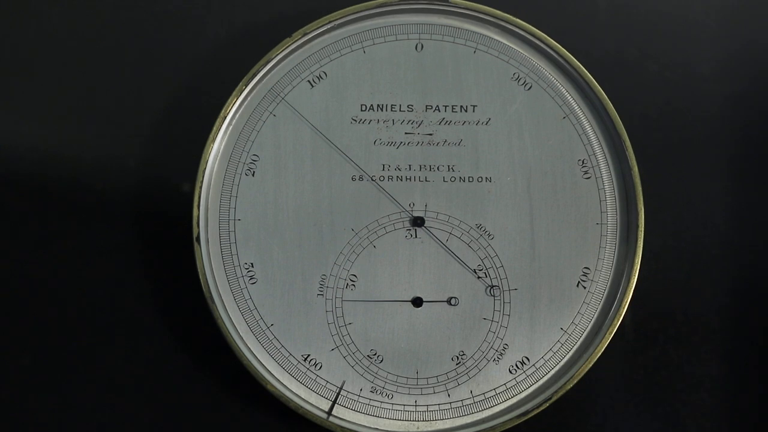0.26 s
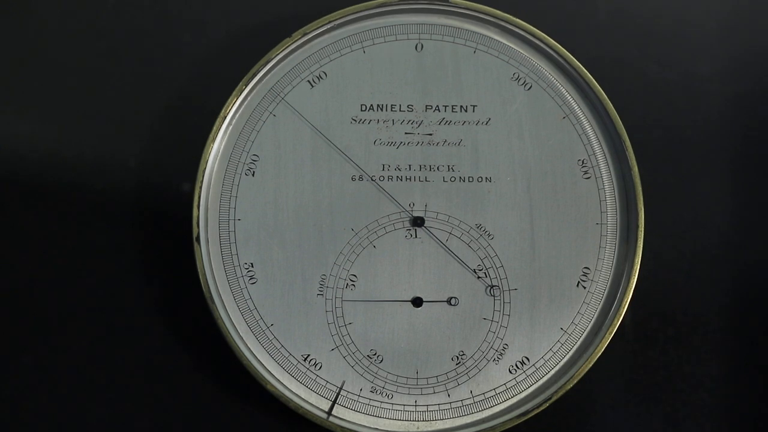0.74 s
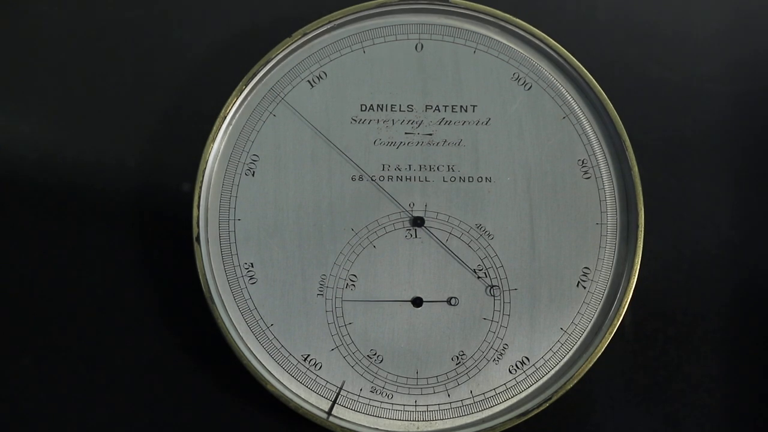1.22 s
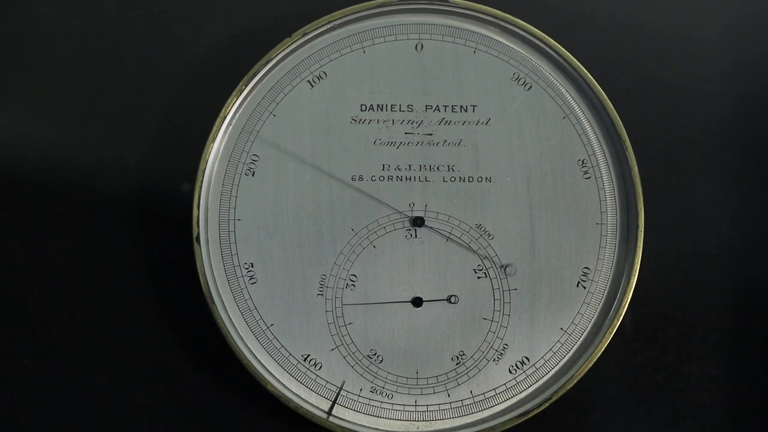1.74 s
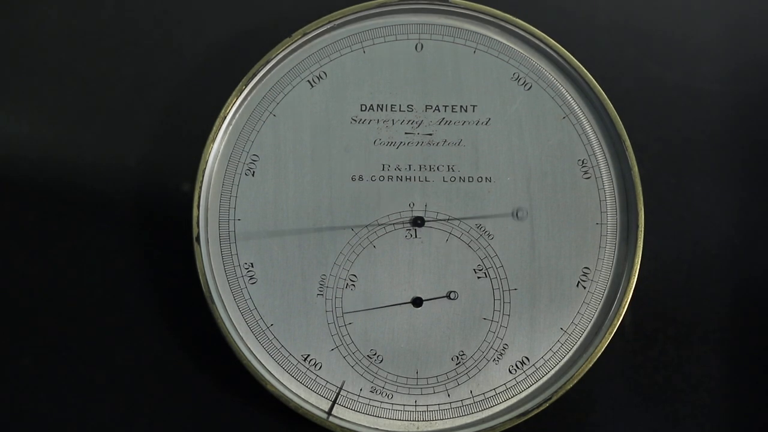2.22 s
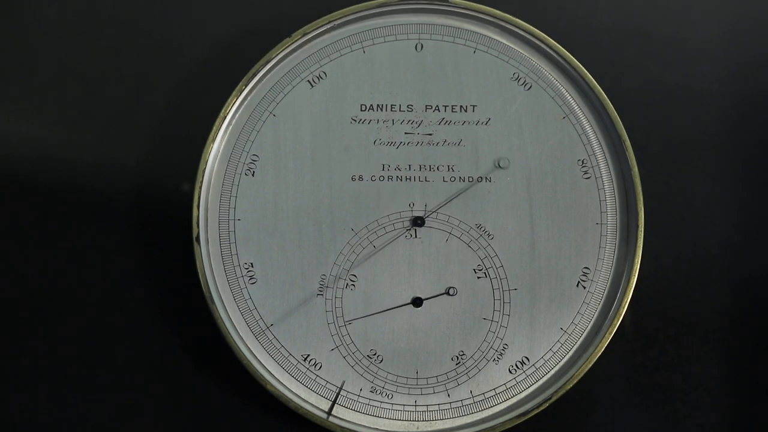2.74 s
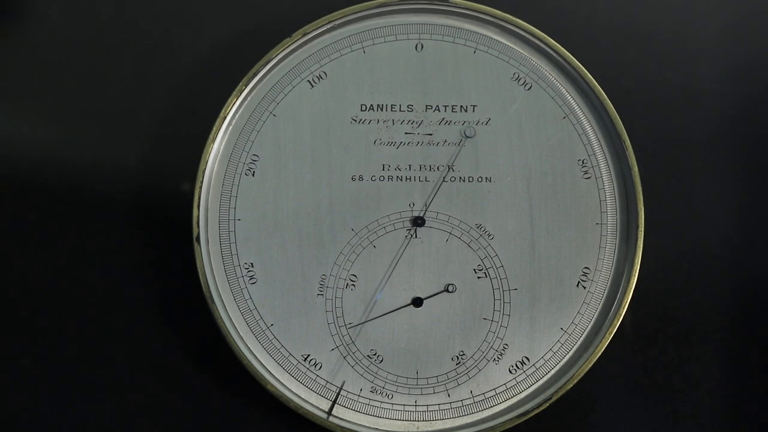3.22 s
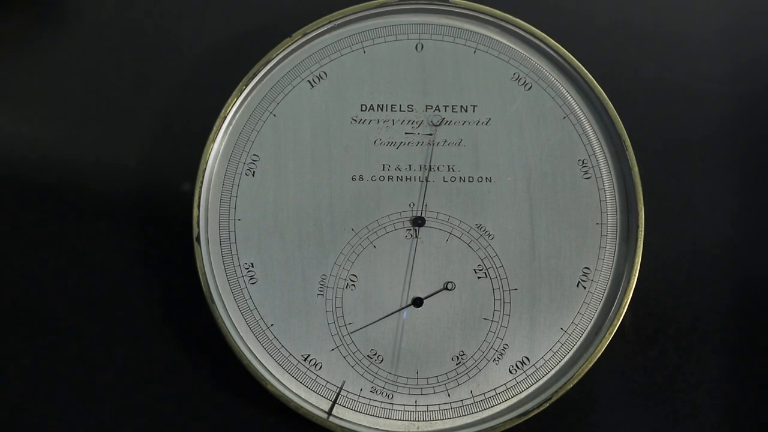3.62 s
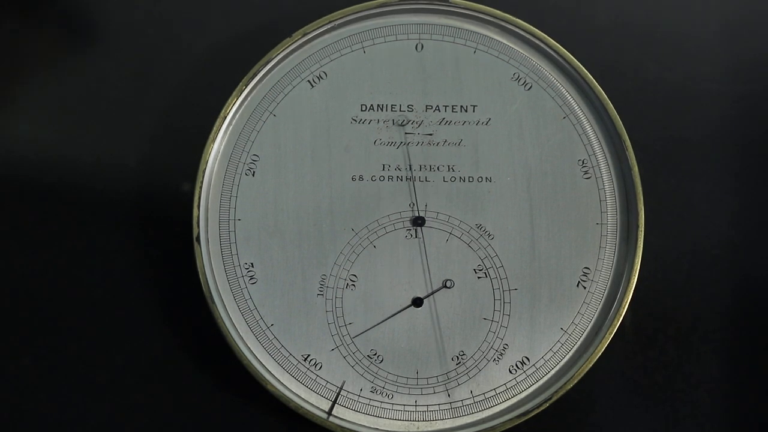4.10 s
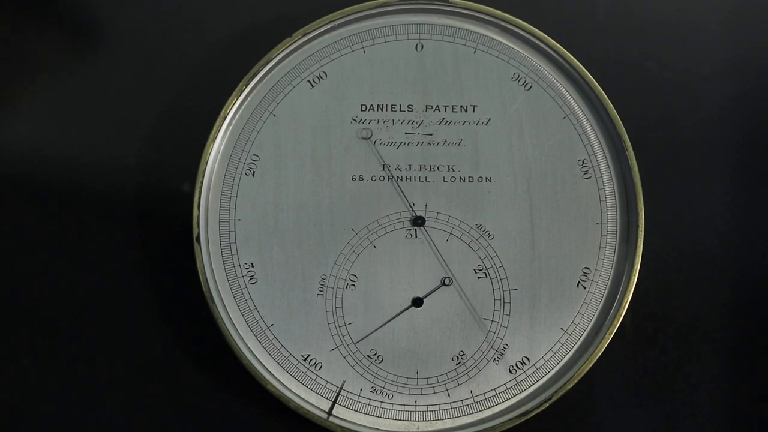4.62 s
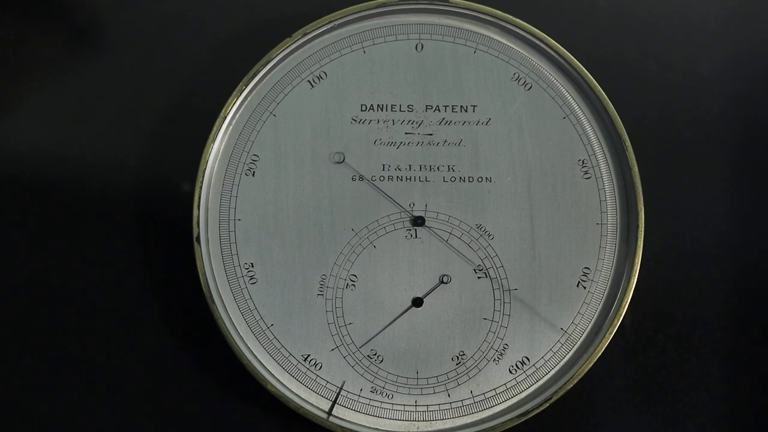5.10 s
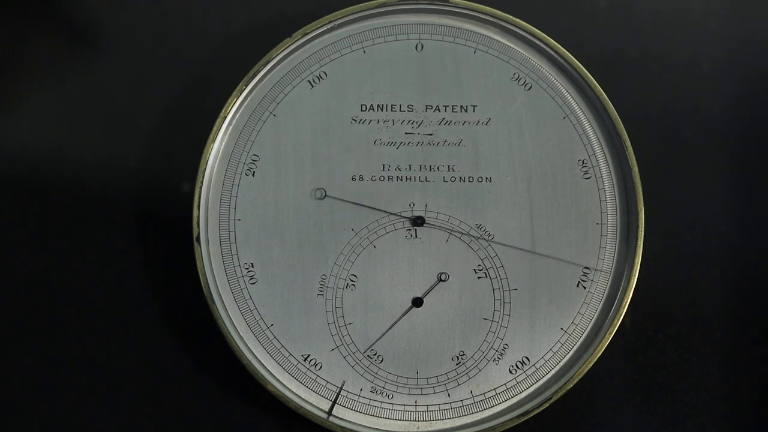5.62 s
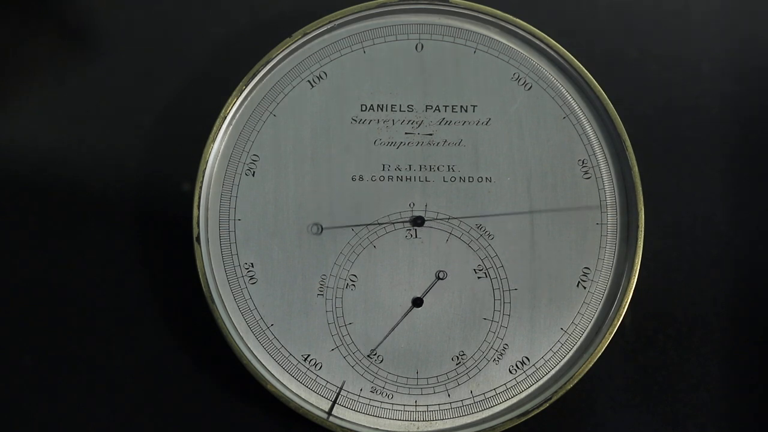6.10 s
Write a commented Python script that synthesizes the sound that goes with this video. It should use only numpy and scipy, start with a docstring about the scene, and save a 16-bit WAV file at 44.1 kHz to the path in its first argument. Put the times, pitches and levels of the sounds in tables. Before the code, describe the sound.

A quiet room with a faint, dark, wide hush. At about 0.14 s a small bright tick sounds nearby, with two much fainter bounces within ten milliseconds. Around 0.54 s comes a very soft, dull knock, blurred by the room. At 1.44 s a switch snaps with a loud, broadband crack, slightly left and briefly overloaded. At once a small electric vacuum pump starts: a bright brush rasp for a tenth of a second, a low thud near 80 Hz, and a rough, rattling whir sweeping quickly upward, swelling as it passes casing resonances. By roughly 2.5 to 3 s it settles into a steady, piercing whine near 1.1 to 1.2 kHz, beating and buzzing, with many higher tones and a hiss of air. From 4.7 s the load eases: the whine softens slightly and creeps up minutely in pitch, still running when the sound ends around 6.35 s.

```python
"""A tick with two fainter bounces and a dull knock break the hush of a room; then a switch snaps and a small
mains-driven vacuum pump rasps, thuds on its feet, runs up and settles into a whine.
Four vanes and twelve rotor slots sing on multiples of the shaft speed, and the mains field splits the slot tone.
Sums of sinusoids make the tones, which swell as they climb through the resonances of the casing;
shaped noise makes the air and brush hiss, the rasp, snap, tick, knock and hush."""
import sys
import numpy as np
from scipy import signal
from scipy.fft import rfft, irfft, next_fast_len
from scipy.io import wavfile
from scipy.ndimage import uniform_filter1d

SR = 44100
rng = np.random.default_rng(int(sys.argv[2]) if len(sys.argv) > 2 else 0)


def wav_record(signal):
    """Record a signal, one row per channel, as 16-bit PCM in the file named by sys.argv[1]."""
    frames = np.transpose(np.atleast_2d(signal))
    bounded = np.clip(frames, -1, 1)
    # unit amplitude maps onto the largest positive 16-bit level
    quanta = np.round(bounded * 32767).astype(np.int16)
    wavfile.write(sys.argv[1], SR, quanta)


N = 280035

START_S = 1.437  # the switch closes
FIELD_HZ = 99.85  # the magnetic pull pulses at twice the mains frequency
FULL_TURNS_PER_S = 91.14  # shaft speed at the end of the run-up
EASE_S = 4.7  # from here on the load eases
HOP = 256  # samples between noise frames and between control points
BINS_HZ = np.fft.rfftfreq(1024, 1 / SR)[:, None]


def gain_of(db):
    """Decibel law: level in dB to amplitude ratio."""
    return 10 ** (np.asarray(db) / 20)


def evened(x):
    """Power normalization: scales to rms 1."""
    return x / np.sqrt(np.mean(x ** 2) + 1e-20)


def read(points, hz):
    """Interpolates an (f/Hz, value) table on a logarithmic frequency axis."""
    f, value = np.transpose(points)
    return np.interp(np.log(hz + 1), np.log(f + 1), value)


def drift(shape, size):
    """Low-passed randomness: twice-averaged noise along the last axis, rms 1."""
    x = rng.standard_normal(shape)
    return evened(uniform_filter1d(uniform_filter1d(x, size), size))


def noise(field_db, same, count):
    """Spectral shaping: random spectra weighted by field_db(hz, t); same is the left-right coherence."""
    t = np.arange(count // HOP + 5) * HOP / SR
    a, b, c, d = rng.standard_normal((4, len(BINS_HZ), len(t)))
    same = np.clip(same, 0, 1)
    left = a + 1j * b
    right = same * left + np.sqrt(1 - same ** 2) * (c + 1j * d)
    spectra = np.array([left, right]) * gain_of(field_db(BINS_HZ, t))
    sound = signal.istft(spectra, nperseg=1024, noverlap=1024 - HOP)[1]
    return evened(sound[:, :count])


def rotor(t, climb_share=.7703, climb_s=.2928, lurch_s=.1041, creep_turns_per_s2=.17):
    """Exponential run-up in turns/s: a quick lurch and a slower climb, then a creep as the load eases."""
    on = np.maximum(t - START_S, 0)
    lack = climb_share * np.exp(-on / climb_s) + (1 - climb_share) * np.exp(-on / lurch_s)
    return FULL_TURNS_PER_S * (1 - lack) + creep_turns_per_s2 * np.maximum(t - EASE_S, 0)


def current(t, build_db=-13, build_s=0.022, slow_db=3, load_db=3, load_s=1.1, ease_db_per_s=-0.94):
    """Motor current as relative level/dB: builds at the start, is high in a slow rotor, sinks with the load."""
    on = np.maximum(t - START_S, 0)
    start_db = build_db * np.exp(-on / build_s) + slow_db * (1 - rotor(t) / FULL_TURNS_PER_S)
    return start_db + load_db * np.exp(-on / load_s) + ease_db_per_s * np.maximum(t - EASE_S, 0)


def orders(top=140, spread_db=2.5, pan_db=3, pan_spread_db=4):
    """Order analysis: every tone as (shaft multiple, field multiple, level/dB, left-right/dB)."""
    # strong shaft tones at full speed, the vanes on every fourth:
    # shaft multiple, rms level/dB before the current acts, left-right/dB
    shaft_tones = [(1, -52, 0), (2, -56, 1), (4, -30, 4), (7, -47, -1), (8, -24, 3), (10, -39, 5),
                   (14, -44, -3), (16, -31, 1), (20, -43, 12), (24, -43, 0), (28, -33, -5), (32, -33, 4),
                   (35, -47, -1), (36, -44, 1), (37, -46, -3), (40, -37, 6), (44, -37, -2), (48, -48, 7),
                   (49, -46, 2), (50, -47, 3), (55, -49, 4), (56, -37, -3), (58, -45, -3), (60, -41, 0),
                   (64, -44, -2), (72, -46, 5), (76, -50, 4), (88, -55, 13), (103, -56, 12), (124, -55, 0),
                   (127, -53, 12), (128, -54, 7), (135, -56, 10)]
    # magnetic tones at full speed:
    # shaft multiple, field multiple, rms level/dB before the current acts, left-right/dB
    magnetic_tones = [(0, 1, -48, 0), (0, 2, -55, 1), (0, 3, -57, 2), (12, -6, -49, 3), (12, -5, -54, 2),
                      (12, -4, -37, 3), (12, -3, -42, 3), (12, -2, -43, -2), (12, -1, -33, 1),
                      (12, 0, -20, -3), (12, 1, -23, 6), (12, 2, -45, -3), (12, 3, -51, 3), (0, 5, -50, 3),
                      (1, 1, -54, 1), (7, -2, -54, 3), (7, 1, -53, 3), (10, -2, -52, 3), (8, 1, -50, 2),
                      (6, -1, -51, 3), (24, -2, -44, -4), (24, 1, -50, 5)]
    # centre of the chance levels of all other shaft multiples: f/Hz, rms level/dB
    faint_levels = [(250, -58.5), (1200, -61), (1700, -52), (2500, -59), (3400, -90), (4400, -51.5),
                    (6500, -61), (7500, -75), (12800, -62.5)]
    tone_list = [(k, 0, db, pan) for k, db, pan in shaft_tones] + list(magnetic_tones)
    taken = [k for k, m, *_ in tone_list if m == 0]
    luck = rng.standard_normal((top + 1, 2))
    for k in range(1, top + 1):
        if k not in taken:
            db = read(faint_levels, k * FULL_TURNS_PER_S) + spread_db * luck[k, 0]
            tone_list.append((k, 0, db, pan_db + pan_spread_db * luck[k, 1]))
    return tone_list


def casing(hz, floor_db=-10, thin_hz=300):
    """Modal superposition: complex resonances over a floor; too small to radiate bass well."""
    # resonances of casing and bench: f/Hz, width/Hz, level/dB
    modes = [(360, 25, -25), (470, 13.5, 12), (505, 70, 8), (661, 40, 11), (680, 47, 9), (729, 4.1, 8.5),
             (786.5, 23, 7), (877, 65, 10), (910, 8.5, 6), (953, 33, -1.5), (1085.7, 41, 7),
             (1151, 34, 8.5), (1197.2, 33, 7), (1404, 24, 8.5), (1464, 16, -8), (1952, 31, 11),
             (2065, 41, 7), (2506, 70, 3), (2866, 95, 0.5), (3204, 36, 4.5), (3420, 27, -8),
             (3654, 33, -6.5), (4016, 8.4, 8.5), (4910, 31, 11), (5100, 9.6, 21.5), (5440, 74, 10.5),
             (6530, 1400, -5), (7850, 96, -28), (11330, 880, 6)]
    peaks = sum(gain_of(db) / (1 + 2j * (hz - f) / width) for f, width, db in modes)
    return (peaks + gain_of(floor_db)) * ((hz + 1) / (hz + 1 - 1j * thin_hz)) ** 3


def walls(size, wet_db=-11, t60=0.66):
    """Reverberation at each microphone: direct sound plus an exponentially dying tail (t60/s)."""
    t = np.arange(SR // 2) / SR
    tail = rng.standard_normal((2, len(t))) * gain_of(-60 * t / t60) * (t > .004)
    return 1 + gain_of(wet_db) * rfft(tail / np.linalg.norm(tail[0]), size)


def tones(growth_db=20, growth_db_per_order=2.0, slot_db_per_order=1.5, waver_db=2.5, flicker_db=3.0,
          shudder_turns=.01):
    """Source-filter principle: tones locked to shaft and field sweep through casing and room."""
    # lead of the left microphone, spacing and reflections together: f/Hz, phase/rad
    left_lead = [(100, .1), (730, .3), (910, .9), (1095, .3), (1460, 1.2), (1820, 1.9), (2550, 2.1),
                 (2920, 1.9), (3650, .6), (4010, -1.0), (5100, -1.6), (5830, -3.5), (6560, -5.9),
                 (12000, -7.3)]
    first, size = round(START_S * SR), next_fast_len(N + SR)
    t, frames = np.arange(first, N) / SR, np.arange(N // HOP + 2) * HOP / SR
    # a slow rotor draws uneven torque and shudders
    slowness = 1 - rotor(t) / FULL_TURNS_PER_S
    turns = np.cumsum(rotor(t)) / SR + shudder_turns * (slowness + 0.034) * drift(len(t), size=150)
    current_db = current(frames)
    speed_ratio = rotor(frames) / FULL_TURNS_PER_S
    decades = np.log10(speed_ratio + 1e-4)
    climbing = np.clip(8 * (1 - speed_ratio), 0, 1) ** 0.27
    path = casing(np.fft.rfftfreq(size, 1 / SR)) * walls(size)
    out = np.zeros((2, N))
    for k, m, db, pan in orders():
        full_hz = k * FULL_TURNS_PER_S + m * FIELD_HZ
        if m or k % 12 == 0:  # magnetic and slot tones follow the current
            drive_db = current_db + slot_db_per_order * max(k - 12, 0) * decades
        else:  # vane blows grow and sharpen with speed
            drive_db = (growth_db + growth_db_per_order * k) * decades
        if k % 4:  # tones off the vane series come from slack and wander more
            drive_db = drive_db + waver_db * drift(len(frames), size=8)
        # shaft-bound tones dip at random until the speed settles
        drive_db = drive_db - flicker_db * (k > 0) * climbing * drift(len(frames), size=4) ** 2
        cycles = k * turns + m * FIELD_HZ * t + rng.random()
        angle = (2 * np.pi * (cycles - np.rint(cycles))).astype(np.float32)
        amplitude = np.sqrt(2) * np.interp(t, frames, gain_of(db + drive_db))
        sides = gain_of([pan / 2, -pan / 2]) * np.exp([0, -1j * read(left_lead, full_hz)])
        # undo the path at the full-speed frequency, so that the listed level and side hold there
        sides = sides / path[:, round(full_hz * size / SR)]
        wave = np.outer(sides.real, np.cos(angle)) - np.outer(sides.imag, np.sin(angle))
        out[:, first:] += amplitude * wave
    return irfft(rfft(out, size) * path, size)[:, :N]


def kick(hz=78, db=-36, rise_s=0.042, t60=1.0):
    """Torque reaction: the start jolts the pump on its feet, a low sinusoid that decays exponentially."""
    t = np.maximum(np.arange(N) / SR - START_S, 0)
    return gain_of(db - 60 * t / t60) * np.minimum(t / rise_s, 1) * np.sin(2 * np.pi * hz * t)


def rush(casing_share=0.35, patchy_db=2.5, rattle_db=2.0, vane_depth=0.04, sixfold_depth=0.11):
    """Amplitude-modulated flow noise: air and brushes, coloured by the casing, puffing with each vane."""
    # rush of air through the pump: f/Hz, density level/dB
    air_colour = [(25, -8), (60, -18), (140, -10), (200, -15), (260, -4.5), (400, 1), (550, -7.5), (750, 2),
                  (1000, -2), (1700, 1), (3000, -4.5), (3800, -7), (5300, -7.5), (8000, -13), (11000, -16),
                  (11500, -18), (12000, -19), (13200, -16.5), (14000, -27.5)]
    # its balance: f/Hz, left-right/dB
    air_balance = [(60, 11), (180, 0), (550, 4), (1650, -1.5), (4960, 4.5), (15000, 1.5)]
    # course of the rush: t/s, level/dB, added treble level/dB
    flow_course = [(1.438, -24, -29), (1.52, -18, -17), (1.6, -21.5, -7.5), (1.7, -31.5, 2),
                   (1.9, -27.5, 4), (2.3, -28.5, 8), (2.6, -27, 7), (3, -31.5, 8), (6.35, -30.5, 7)]
    same = ((60, .99), (600, .95), (1500, .8), (4000, .6), (15000, .55))  # f/Hz, left-right coherence
    s, level_db, treble_db = np.transpose(flow_course)
    sides = np.array([.5, -.5])[:, None, None]

    def field_db(hz, t):
        """Spectral level/dB: air colour, casing, balance, treble and random patches."""
        colour = read(air_colour, hz) + casing_share * 20 * np.log10(abs(casing(hz)))
        balance = sides * read(air_balance, hz)
        treble = np.interp(t, s, treble_db) / (1 + (2500 / (hz + 1)) ** 4)
        return colour + balance + treble + patchy_db * drift((len(hz), len(t)), size=10)

    t = np.arange(N) / SR
    turns = np.cumsum(rotor(t)) / SR
    puffs = 1 + vane_depth * np.cos(2 * np.pi * 4 * turns) + sixfold_depth * np.cos(2 * np.pi * 6 * turns)
    # loose vanes clatter while slow
    rattle = gain_of(rattle_db * (1 - rotor(t) / FULL_TURNS_PER_S) * drift(N, size=70))
    level = gain_of(np.interp(t, s, level_db, left=-120))
    return level * puffs * rattle * noise(field_db, read(same, BINS_HZ), N)


def rasp(from_s=1.445, to_s=1.56, db=-33):
    """Friction noise: the brushes scrape brightly as the rotor breaks loose, then stop."""
    # rasp of the brushes: f/Hz, density level/dB
    rasp_colour = [(1500, -30), (2400, -4), (3750, 1), (5950, -7), (7600, -2), (10000, -11), (15400, -30)]
    first, count = round(from_s * SR), round((to_s - from_s) * SR)
    scrape = noise(lambda hz, t: read(rasp_colour, hz), 0.17, count)
    out = np.zeros((2, N))
    out[:, first:first + count] = gain_of(db) * signal.windows.tukey(count, .3) * scrape
    return out


def hit(colour, at_s, db, rise_s, t60, tail_db, tail_t60, same=0.32):
    """Double exponential decay: noise with a quick rise, a short crack and a longer room tail."""
    t = np.arange(SR) / SR
    decay = gain_of(-60 * t / t60) + gain_of(tail_db - 60 * t / tail_t60)
    shape = np.minimum(t / rise_s, 1) ** 2 * decay
    out = np.zeros((2, N))
    burst = noise(lambda hz, t: read(colour, hz), same, SR)
    out[:, round(at_s * SR):][:, :SR] = gain_of(db) * shape * burst
    return out


def snap():
    """Impact radiation: the switch closes with a loud broadband crack, stronger on the left."""
    # the switch: f/Hz, density level/dB
    snap_colour = [(120, -30), (200, -19), (990, -4.5), (3410, -8.5), (3940, 1.5), (4560, -10), (5090, -4),
                   (5570, -9), (8160, -6), (12600, -12.5), (15400, -27)]
    crack = hit(snap_colour, START_S, -2.0, rise_s=0.0013, t60=0.028, tail_db=-20, tail_t60=0.56)
    return crack * gain_of([[1.5], [-1.5]])


def bouncing_tick():
    """Repeated impact: a small tick nearby and its fainter bounces."""
    # the tick: f/Hz, density level/dB
    tick_colour = [(880, -42), (1500, -8), (3150, -12), (6120, 3), (10500, -15), (12700, -18), (15000, -25)]
    # tick and bounces: t/s, level/dB
    bounces = [(0.1368, -32), (.1428, -48), (.146, -48)]
    return sum(hit(tick_colour, s, db, rise_s=0.00038, t60=0.0048, tail_db=-18, tail_t60=.15)
               for s, db in bounces)


def distant_knock():
    """Impact in a reverberant field: a dull knock whose tail is nearly as strong as its onset."""
    # the knock: f/Hz, density level/dB
    knock_colour = [(59, -28), (100, -4), (377, -10), (637, -6), (895, -12), (967, -6), (3600, -21),
                    (4400, -11), (5200, -18), (12000, -33)]
    return hit(knock_colour, .543, -51, rise_s=0.0093, t60=0.15, tail_db=-1.8, tail_t60=1.8)


def hush(db=-55):
    """Diffuse background: steady coloured noise, little alike at the two microphones."""
    # hush of the room: f/Hz, density level/dB
    room_colour = [(15, -41), (25, 0), (151, -9), (193, 2), (227, -7), (330, -2.5), (378, -6), (521, -8),
                   (596, -5.5), (1020, -10), (1340, -10), (1530, -11.5), (2840, -12.5), (15400, -25)]
    # its left-right likeness: f/Hz, coherence
    room_likeness = [(60, 0.17), (380, 0.23), (2380, 0.058), (15000, 0.11)]
    return gain_of(db) * noise(lambda hz, t: read(room_colour, hz), read(room_likeness, BINS_HZ), N)


def scene():
    """Superposition: the pump and its switch, a tick and a knock before it, and the hush of the room."""
    near = rush() + rasp() + snap()
    near[1] = np.roll(near[1], 6)  # samples by which the right microphone hears these later
    return tones() + kick() + near + bouncing_tick() + distant_knock() + hush()


def record(dry):
    """Saturation and band limit: the snap overloads the converter, then a low-pass cuts the top."""
    clipped = np.clip(dry, -1, 1)
    low_pass = signal.firwin(511, 15700, window=("kaiser", 9), fs=SR)  # edge in Hz
    return signal.oaconvolve(clipped, low_pass[None], "same")


dry = scene()
out = record(dry)
wav_record(out)
```